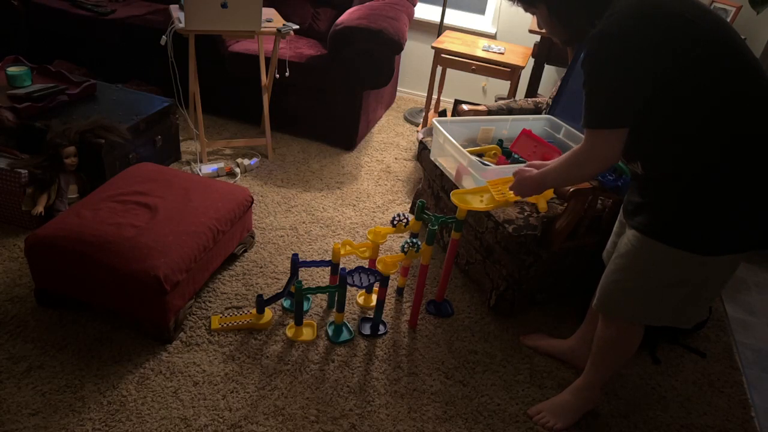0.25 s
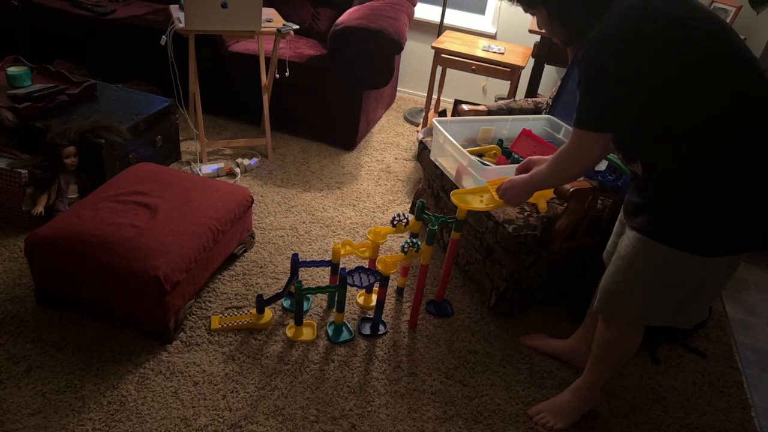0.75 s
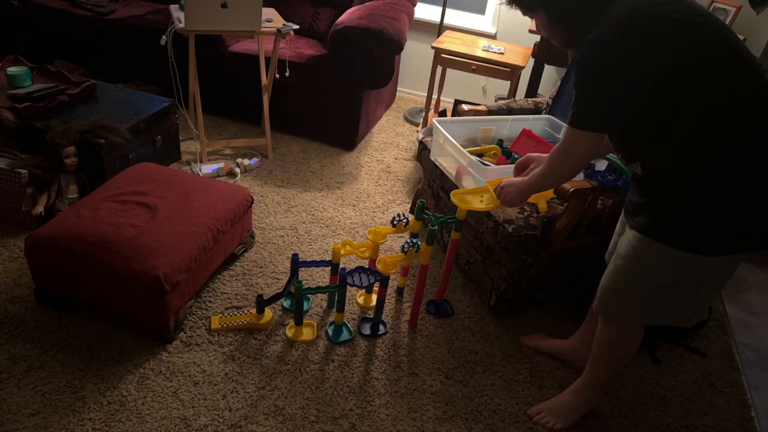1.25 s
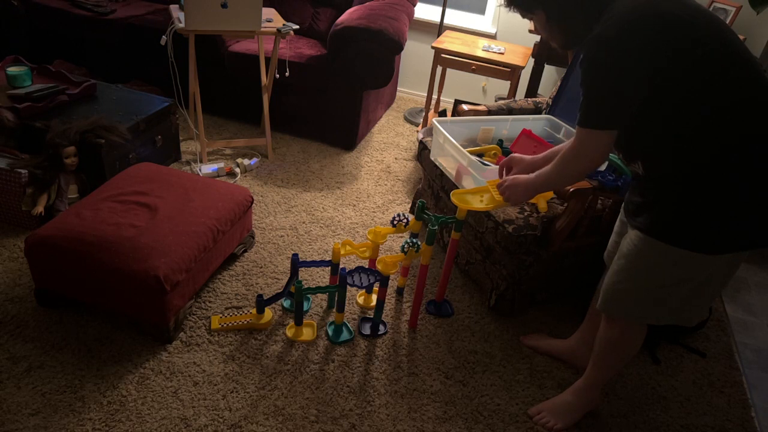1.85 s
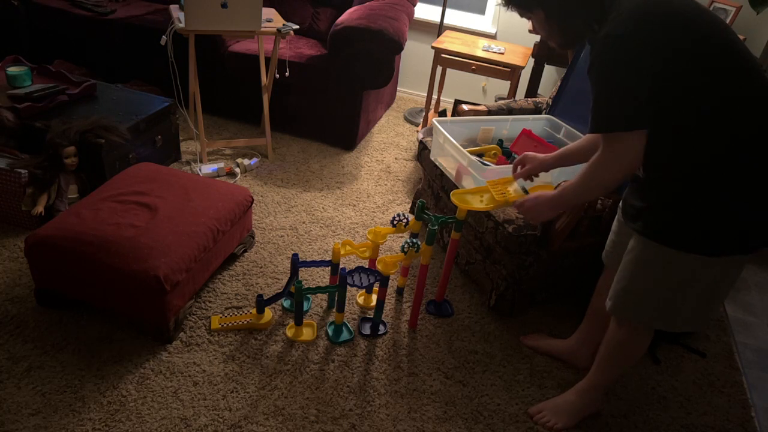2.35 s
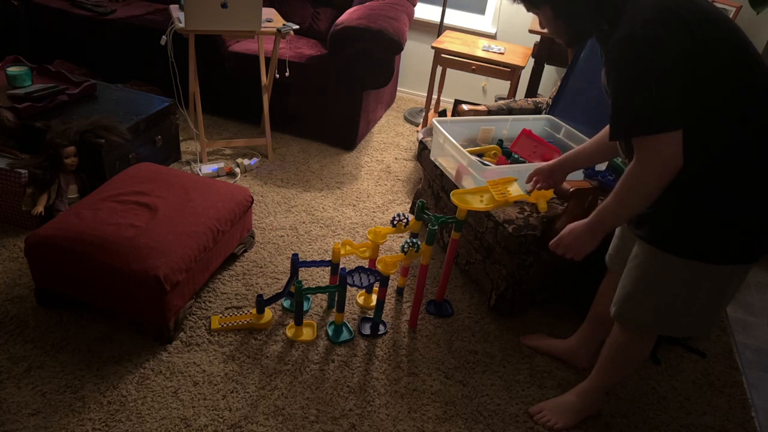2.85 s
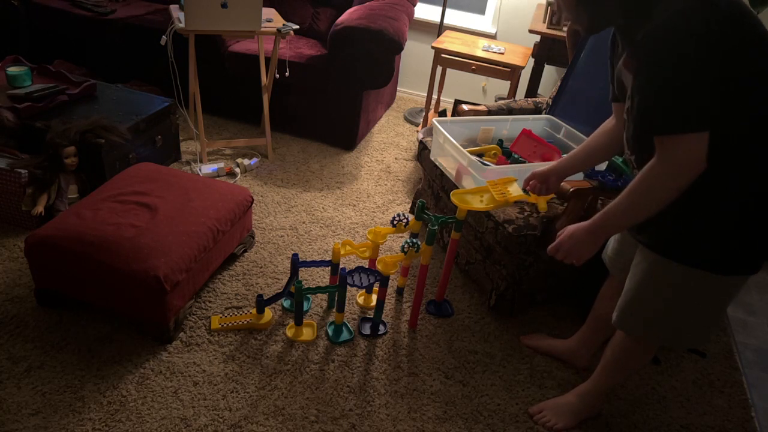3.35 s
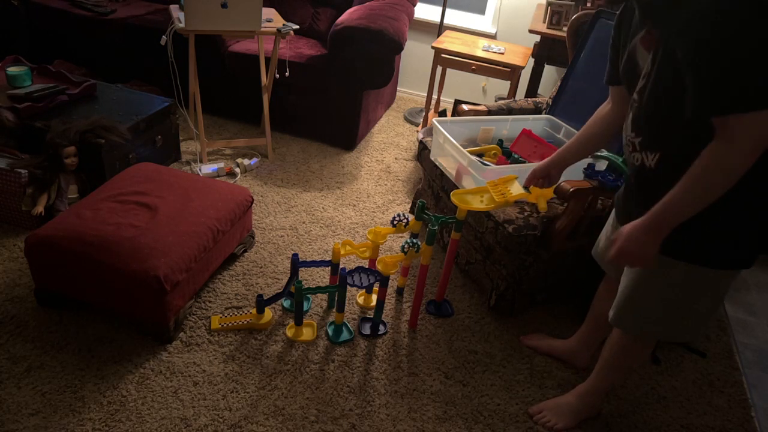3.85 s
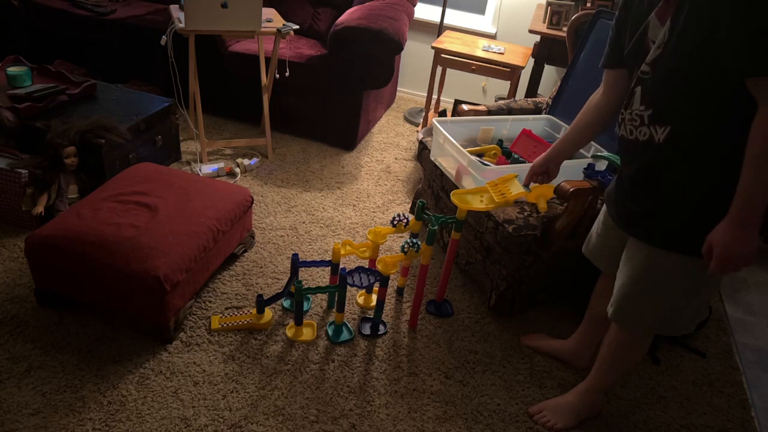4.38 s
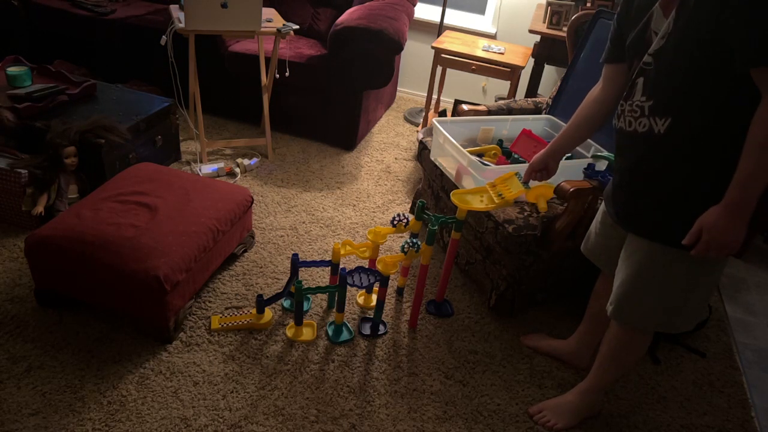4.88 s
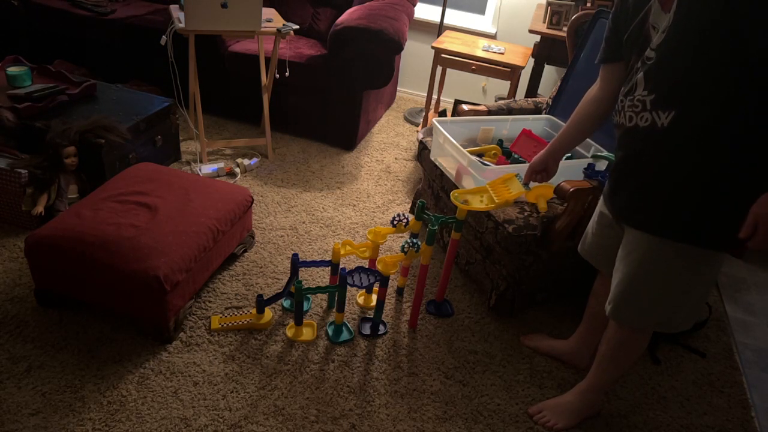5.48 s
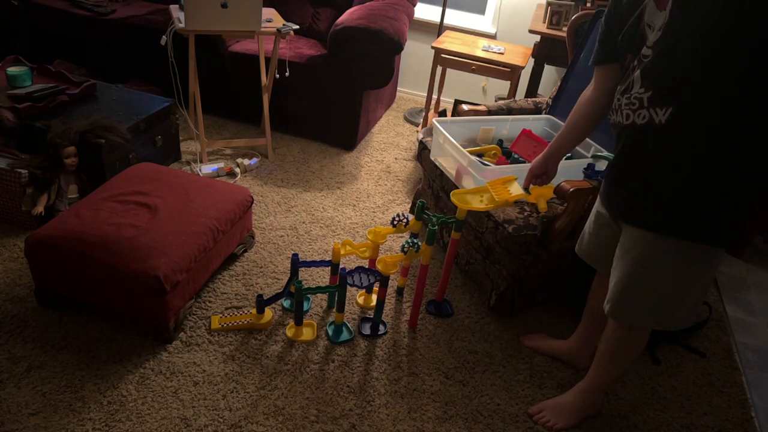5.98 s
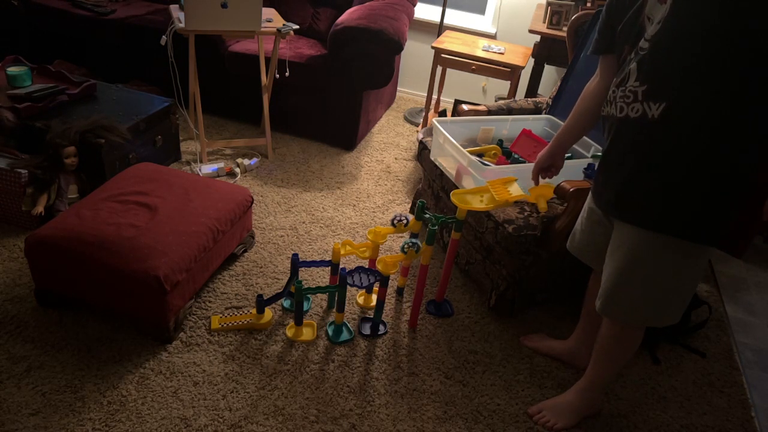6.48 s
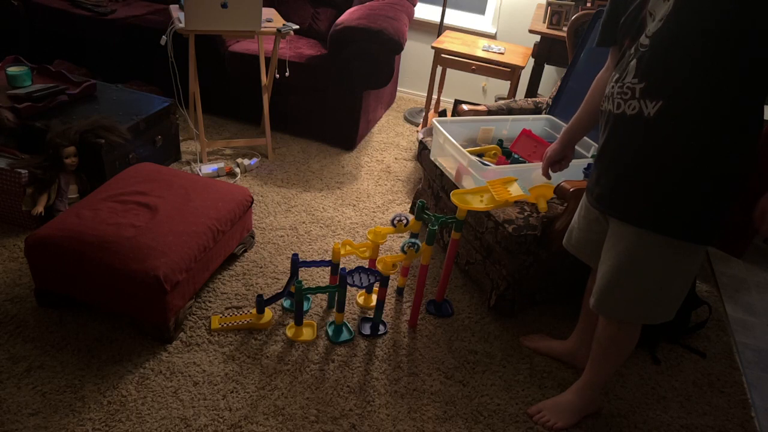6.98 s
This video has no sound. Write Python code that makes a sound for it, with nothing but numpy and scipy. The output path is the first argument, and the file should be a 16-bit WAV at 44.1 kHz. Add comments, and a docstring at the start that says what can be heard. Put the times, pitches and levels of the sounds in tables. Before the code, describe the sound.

Indoors, over a soft appliance hum, hiss and deep faint rumble, marbles tick lightly in a tray. One marble knocks its way down hollow plastic pieces, slowing to spaced clacks, then tapping faster and softer until it stops. A loud hollow gate slam follows, and a crowd of marbles rushes down the track in a dry, bright, continuous rattle with short pings, still going when it cuts off. Short room echo.

```python
"""Small ticks of marbles set into a tray, then a lone marble bouncing on a plastic toy track in a carpeted room.
A gate is knocked open and a crowd of marbles clatters down, now and then striking a ringing part.
Blows are filtered cracks plus decaying modes; rolling is random small knocks; the room adds random echo taps.
A faint appliance hum, hiss, a deep rumble and one thin whistle are filtered noise and wavering sines."""
import sys
import numpy as np
from scipy import signal
from scipy.fft import rfft, irfft
from scipy.io import wavfile
from scipy.ndimage import uniform_filter1d

SR = 44100
rng = np.random.default_rng(int(sys.argv[2]) if len(sys.argv) > 2 else 0)


def generate_wav(sig):
    """Save sig (samples, or channels by samples) to the path in sys.argv[1] as 16-bit PCM at SR."""
    pcm = np.round(np.clip(np.atleast_2d(sig).T, -1, 1) * 32767).astype(np.int16)
    wavfile.write(sys.argv[1], SR, pcm)


def makeup_ratio(level_db):
    """Linear amplitude ratio for a level in decibels (20 dB per factor of ten)."""
    decades = np.asarray(level_db, float) / 20
    return 10 ** decades


N = 318843
LEAD = 128  # samples that the band split smears ahead of a knock

# Modes of the track pieces. Each row: frequency in Hz, width in Hz (wider dies faster), level in dB.
TRACK = [(688, 18.5, -2), (1020, 12.7, -8.5), (1390, 9.5, -1), (2051, 150, 10.5), (2340, 24, 1),
         (2635, 43, 7), (3030, 66, 8.5), (3280, 59, 14), (4240, 73, 7), (4620, 92, -8), (4470, 8.3, -43),
         (5366, 99, -4.5), (5330, 330, -27.5), (6140, 220, -47), (6580, 140, -32)]


def evened(x):
    """Scales to rms 1."""
    return x / np.sqrt(np.mean(x ** 2) + 1e-20)


def read(points, hz):
    """Interpolates a table on a log-frequency axis."""
    f, value = np.transpose(points)
    return np.interp(np.log(hz + 1), np.log(f + 1), value)


def add(mix, start_s, sound):
    """Adds a sound at start_s, cut at the end of the mix."""
    part = mix[round(start_s * SR):][:len(sound)]
    part += sound[:len(part)]


def ring(hz, t60_s, size):
    """A sine that decays by 60 dB in t60_s."""
    t = np.arange(size) / SR
    return makeup_ratio(-60 * t / t60_s) * np.sin(2 * np.pi * hz * t)


def hiss():
    """Room and microphone hiss: noise shaped in frequency."""
    # Hiss spectrum. Each row: frequency in Hz, relative density in dB per Hz.
    hiss_shape = [(35, -32), (60, -19), (91, -3.5), (129, -7.5), (171, -1), (211, -10), (266, -3),
                  (336, -7), (709, -18.5), (874, -15.5), (1030, -20.5), (3450, -32.5), (9850, -45),
                  (13700, -35), (15700, -51)]
    hz = np.fft.rfftfreq(N, 1 / SR)
    noise = irfft(rfft(rng.standard_normal(N)) * makeup_ratio(read(hiss_shape, hz)), N)
    return makeup_ratio(-58) * evened(noise)


def hum():
    """Appliance hum: steady lines that waver in level and phase under slow complex noise."""
    # Hum lines. Each row: frequency in Hz, rms level in dB before wavering.
    hum_lines = [(86.1, -63), (118.4, -67), (177.6, -68), (263.8, -75), (312.2, -79), (506.0, -76),
                 (877.5, -74.5)]
    # Unsteadiness of each hum line in turn, 0 to 1.
    unsteadiness = [0.078, 0.055, 0.56, 0.68, 0.35, 0.11, 0.09]
    t = np.arange(N) / SR
    out = np.zeros(N)
    for (hz, db), waver in zip(hum_lines, unsteadiness):
        slow = uniform_filter1d(rng.standard_normal((2, N)), size=3000)
        a, b = uniform_filter1d(slow, size=3000)
        wobble = 1 + waver * (evened(a) + 1j * evened(b))
        out += np.sqrt(2) * makeup_ratio(db) * (wobble * np.exp(2j * np.pi * hz * t)).real
    return out


def rumble():
    """Deep rumble from outside: noise around 30-55 Hz on a slow swell."""
    # Rumble swell. Each row: time in seconds, level in dB.
    swell = [(0.0, -69), (3.5, -67), (6.26, -60.5), (7.23, -64)]
    band = signal.butter(2, [30, 55], "bandpass", fs=SR, output="sos")
    noise = evened(signal.sosfilt(band, rng.standard_normal(N)))
    return noise * makeup_ratio(np.interp(np.arange(N) / SR, *np.transpose(swell)))


def whistle():
    """A weak sine wavering in pitch and level, with a fainter partner above it."""
    # Whistle pitch. Each row: time in seconds, frequency in Hz.
    pitch = [(4.63, 11435), (4.652, 11332), (4.69, 12436), (4.742, 11865), (4.812, 12200), (4.846, 11763),
             (4.888, 12300), (4.965, 10300), (5.0, 10150)]
    level_db, flicker_depth = -80.5, 0.9
    partner_ratio, partner_db = 1.25, -8
    s, hz = np.transpose(pitch)
    t = np.arange(s[0], s[-1], 1 / SR)
    jitter_hz = 60 * evened(uniform_filter1d(rng.standard_normal(len(t)), size=200))
    phase = 2 * np.pi * np.cumsum(np.interp(t, s, hz) + jitter_hz) / SR
    flicker = 1 + flicker_depth * evened(uniform_filter1d(rng.standard_normal(len(t)), size=600))
    tone = np.sin(phase) + makeup_ratio(partner_db) * np.sin(partner_ratio * phase)
    fade = signal.windows.tukey(len(t), 0.2)
    out = np.zeros(N)
    add(out, s[0], np.sqrt(2) * makeup_ratio(level_db) * tone * flicker * fade)
    return out


def tray():
    """Hollow knocks of the big start tray: decaying modes that swell as echoes arrive."""
    # Tray modes. Each row: frequency in Hz, level in dB, t60 in seconds.
    tray_modes = [(304.7, 2, 0.19), (299, -4.5, 0.26), (295, 5, 0.09), (373, 1, 0.082), (510, -10, 0.08),
                  (682, 3, 0.13), (973, 0.5, 0.21)]
    # Tray knocks. Each row: start in seconds, level in dB.
    tray_knocks = [(2.093, -44), (5.213, -21), (5.244, -19.5)]
    out, t = np.zeros(N), np.arange(20000) / SR
    swell = (1 - np.exp(-t / 0.015)) ** 2
    body = sum(makeup_ratio(db) * ring(hz, t60_s, len(t)) for hz, db, t60_s in tray_modes)
    for s, db in tray_knocks:
        add(out, s, makeup_ratio(db) * body * swell)
    return out


def chime():
    """A small hard part rings on: two close low modes beat under a high one, swelling as echoes arrive."""
    # Modes of the ringing part. Each row: frequency in Hz, level in dB, t60 in seconds.
    chime_modes = [(4060, 0.5, 0.16), (4150, 1.5, 0.28), (7900, 3, 0.18)]
    # Strikes on it. Each row: start in seconds, level in dB, extra gain of the top mode in dB.
    strikes = [(6.4534, -29, -20), (6.5008, -27, -15), (7.1368, -13.5, -14.5)]
    sag_per_s = 0.2  # share of pitch lost in a second as the part swings
    flutter_depth = 0.4  # echoes beat with the ring
    out, t = np.zeros(N), np.arange(20000) / SR
    bend = 1 - sag_per_s * t / 2
    for s, db, top_db in strikes:
        low, beat, top = (makeup_ratio(m) * ring(hz * bend, t60_s, len(t)) for hz, m, t60_s in chime_modes)
        flutter = 1 + flutter_depth * evened(uniform_filter1d(rng.standard_normal(len(t)), size=300))
        tone = low + beat + makeup_ratio(top_db) * top
        add(out, s, makeup_ratio(db) * tone * flutter * (1 - np.exp(-t / 0.0012)))
    return out


def knock_parts(own_hz, modes_db=-7, own_db=-5):
    """One marble on the track: dry crack, track modes in a chance mix, short ring of the piece hit.
    Returns dull, middle, bright and sharp parts of equal energy."""
    # Bare crack of glass on plastic. Each row: frequency in Hz, relative density in dB per Hz.
    crack_shape = [(300, -23), (600, -10), (1000, -2.5), (1700, 0), (2400, 0.5), (3500, 1), (4300, -3),
                   (5200, -13.5), (7000, -19.5), (9000, -24), (11500, -28), (13200, -33), (14800, -31),
                   (16000, -33)]
    size = 4096
    hz, t = np.fft.rfftfreq(size, 1 / SR), np.arange(size) / SR
    mix, detune = rng.standard_normal((2, len(TRACK)))
    body = sum(makeup_ratio(db + 7 * m) * ring(f * (1 + 0.0033 * d), 4.2 / width, size)
               for (f, width, db), m, d in zip(TRACK, mix, detune))
    crack = 0.14 * rng.standard_normal(size) * np.exp(-t / 0.0034)  # loose joints chatter after contact
    crack[0] = 1
    crack = irfft(rfft(crack) * makeup_ratio(read(crack_shape, hz)))
    own = ring(own_hz, 0.045, size)
    sound = rfft(evened(crack) + makeup_ratio(modes_db) * evened(body) + makeup_ratio(own_db) * evened(own))
    # thin plastic gives no bass: nothing is kept below the first edge
    above = [1 / (1 + (edge_hz / (hz + 1)) ** 8) for edge_hz in (430, 1200, 2800, 5000)]
    bands = -np.diff(above + [0 * hz], axis=0)
    parts = np.roll(irfft(sound * bands), LEAD, axis=1)
    spread = 12  # the room spreads a knock's energy over about 150 samples near its peak
    return spread * parts / np.linalg.norm(parts, axis=1)[:, None]


def small_knocks():
    """Random small knocks of rolling marbles, a few larger, as low and high layers at three places."""
    knocks_per_s, pieces = 450, 9
    low, high = np.zeros((2, 3, N))
    for k, hz in enumerate(np.geomspace(1300, 3100, num=pieces)):
        hit = rng.random(N) < knocks_per_s / pieces / SR
        size = makeup_ratio(1.8 * np.minimum(rng.exponential(1, N), 4)) * hit
        dull, middle, bright, sharp = knock_parts(hz, modes_db=-10, own_db=-13)
        low[k % 3] += signal.oaconvolve(size, makeup_ratio(-16) * dull + middle)[:N]
        high[k % 3] += signal.oaconvolve(size, bright + makeup_ratio(-5) * sharp)[:N]
    return evened(low), evened(high)


def tube_hum():
    """Noise keeps the lowest tube mode and its two upper partners humming."""
    # Level in dB of the 2nd and 3rd air modes.
    upper_db = [-2, -10]
    hz, width, _ = TRACK[0]
    modes = ring(hz, 1.9 / width, 8192)
    for k, db in zip((2, 3), upper_db):
        modes = modes + makeup_ratio(db) * ring(TRACK[k][0], 6.1 / width, 8192)
    return evened(signal.oaconvolve(rng.standard_normal(N), modes)[:N])


def tower_shake():
    """The towers shake on the carpet under the marbles: noise at 230-430 Hz."""
    band = signal.butter(2, [230, 430], "bandpass", fs=SR, output="sos")
    return evened(signal.sosfilt(band, rng.standard_normal(N)))


def rattle():
    """Rolling: small knocks, tube hum and shaking follow one level curve; lone marbles dull, the crowd bright."""
    # How much is rolling. Each row: time in seconds, level in dB.
    rolling = [(0.0, -56), (0.11, -61.5), (0.4, -92), (1.2, -82), (1.308, -57), (1.454, -64), (1.66, -63),
               (1.92, -63), (2.1, -64), (3.2, -67), (3.772, -61), (4.116, -66), (4.5, -90), (5.14, -60.5),
               (5.19, -59), (5.31, -27.5), (5.38, -36.5), (5.75, -26.5), (6.04, -28), (6.23, -39.5),
               (6.47, -44), (6.62, -34), (7.23, -35)]
    crowd_s, tube_exit_s = 5.14, 6.26  # the crowd starts; it leaves the tube
    t = np.arange(N) / SR
    bright_db = np.where(t < crowd_s, -36, -9.5)
    tube_db = np.where(t < crowd_s, -3, -2) - 8.5 * (t > tube_exit_s)
    low, high = small_knocks()
    out = low + makeup_ratio(bright_db) * high
    out[0] += makeup_ratio(tube_db) * tube_hum()
    out[1] += makeup_ratio(-18.5) * tower_shake()
    level_db = np.interp(t, *np.transpose(rolling))
    return out * makeup_ratio(level_db) / np.sqrt(6)


def blows():
    """Distinct blows, dealt in turn to three places along the track; harder contact is brighter."""
    # Blows: marbles set or settling in the tray; bounces of a lone marble on the plastic track;
    # the gate lifting and slamming; the crowd's loudest collisions.
    # Each row: start in seconds, level in dB, ring of the piece hit in Hz, hardness in dB.
    loading, bounces = [(0.0044, -49.5, 1630, 2), (0.0355, -45.5, 1850, -3), (0.054, -44.5, 2700, -5),
                        (0.144, -46, 1720, -7), (0.218, -49.5, 1755, -12), (0.3027, -53, 1730, -8),
                        (0.8875, -52.5, 1710, 9), (0.9794, -57.5, 1420, 2), (1.047, -55, 1720, 1),
                        (1.1704, -59, 1760, 15), (1.265, -47.5, 2670, -5), (1.3343, -37.5, 2930, -2),
                        (1.406, -45.5, 1535, -3), (1.4985, -49, 2970, -4), (1.5463, -42.5, 3000, 6.5),
                        (4.0302, -48.5, 1710, 1), (4.1032, -60, 1590, -5), (4.1778, -55.5, 2440, 2),
                        (4.28, -52.5, 1840, -5), (4.306, -59, 2510, -8), (4.9708, -60, 2670, 6),
                        (4.992, -56, 2680, 5)], [(1.6671, -36, 1940, -2), (1.7532, -35, 1720, -2),
                                         (1.8436, -35, 1384, -3), (1.9215, -36, 1790, -10),
                                         (1.9687, -29.5, 2560, 6.5), (2.05, -41.5, 1390, -2),
                                         (2.0883, -23.5, 3080, 8), (2.102, -29, 1690, -11),
                                         (2.175, -40, 1390, -10), (2.2189, -28.5, 2220, 5),
                                         (2.2242, -28, 1375, -0.5), (2.4514, -26, 1754, 2),
                                         (2.6724, -41, 1750, -4), (2.6811, -29.5, 2090, -1),
                                         (2.8596, -29, 2430, 2), (3.012, -44, 2300, -8),
                                         (3.0245, -31, 2130, -0.5), (3.1628, -30.5, 1890, 0),
                                         (3.235, -46, 1380, -20), (3.2964, -31, 1740, -2.5),
                                         (3.3987, -33, 2170, -1), (3.4835, -36.5, 2200, -1),
                                         (3.5603, -36, 1700, -4.5), (3.6384, -38.5, 1730, -2),
                                         (3.706, -40.5, 1720, -2), (3.7569, -42.5, 1540, 0),
                                         (3.813, -46, 1730, -4), (3.8452, -48, 1640, -8),
                                         (3.9052, -44.5, 1676, -7)]
    gate, clatter = [(5.1333, -37.5, 1270, 0), (5.1445, -35.5, 2660, 2), (5.164, -37.5, 1330, 6),
                     (5.2125, -11, 2410, -4), (5.2294, -13, 2320, 2.5), (5.2439, -11, 2630, -1),
                     (5.2579, -24, 2340, -16), (5.2894, -18, 2450, 0.5), (5.3151, -22, 1470, 5.5)], [(5.4331, -31, 1390, 15), (5.4658, -29, 2350, 9),
                                   (5.4855, -19.5, 2835, 5.5), (5.5348, -18.5, 3030, 1),
                                   (5.5694, -19.5, 2340, 2.5), (5.5942, -19, 2520, -1),
                                   (5.6291, -20.5, 2340, 0.5), (5.6802, -18, 2340, -2),
                                   (5.7028, -28.5, 2360, 10.5), (5.7207, -15, 2350, -4),
                                   (5.7378, -16.5, 1720, 1), (5.7644, -17.5, 2340, 4.5),
                                   (5.7844, -22.5, 2340, 5), (5.804, -17.5, 1990, -36),
                                   (5.8337, -18, 3030, 2.5), (5.845, -17.5, 1985, -17),
                                   (5.8644, -19.5, 1985, -6), (5.9244, -16.5, 2930, 3),
                                   (5.9534, -31.5, 1390, 15), (5.9778, -18.5, 3030, 2),
                                   (6.0065, -17, 1390, -0.5), (6.019, -22.5, 3030, 2),
                                   (6.0527, -16.5, 2370, -2), (6.0611, -22, 2410, -1),
                                   (6.0995, -25.5, 2950, 5), (6.122, -18.5, 2370, -2.5),
                                   (6.1905, -23.5, 4095, 2), (6.1965, -18, 2310, 1),
                                   (6.2163, -22, 1725, -3), (6.2494, -29, 1900, -15),
                                   (6.3518, -36, 2050, -18), (6.3904, -21.5, 1790, -4),
                                   (6.4009, -18, 2360, -1), (6.4194, -22, 2230, 3.5),
                                   (6.4464, -17, 2310, -2.5), (6.4595, -19, 4040, 0.5),
                                   (6.4994, -20, 3980, -9), (6.5294, -23.5, 4180, -25),
                                   (6.5934, -33, 4040, 1), (6.615, -17, 2090, 2.5), (6.6344, -23, 2120, -5),
                                   (6.6594, -28.5, 2200, 3), (6.7406, -23.5, 2130, -20),
                                   (6.7615, -29.5, 2100, -2.5), (6.832, -25.5, 1420, 0),
                                   (6.8374, -18.5, 2360, -6), (6.8857, -21, 2890, 3.5),
                                   (6.9194, -22, 2420, 0), (6.9452, -25.5, 1870, 0),
                                   (7.0094, -30.5, 2270, -12), (7.0918, -23, 1613, -3),
                                   (7.1151, -19.5, 2380, -13), (7.1304, -24.5, 3830, 10.5),
                                   (7.1345, -21.5, 2280, 2), (7.1379, -19, 2190, 1),
                                   (7.1428, -25.5, 4090, 6), (7.1537, -31, 4060, 7),
                                   (7.201, -22, 2350, -0.5)]
    # Colour of an average blow, in dB: dull, bright and sharp parts against the middle,
    # ring of the piece, track modes.
    loading_colour, bounce_colour = [-16.5, -15, -17, -4.5, -6], [-11, -25, -16.5, -10, -9]
    gate_colour, clatter_colour = [-10, -7, -6.5, -7, -6.5], [-14.5, -4.5, -7, -3, -7]
    # Gain of the dull, bright and sharp parts, in dB per dB of hardness.
    hardening = np.array([0.019, 0.21, 0.86])
    spot_db = 2  # chance of the spot hit, in the dull and bright parts
    bright_db_per_octave = 6  # small pieces ring higher and sound brighter
    own_db_per_hardness_db = -0.29  # soft blows leave more of the piece's own ring
    thinning_db_per_s = -0.5  # the crowd's dull part fades as it reaches the smaller pieces lower down
    out = np.zeros((3, N + LEAD))
    for table, colour in ((loading, loading_colour), (bounces, bounce_colour),
                          (gate, gate_colour), (clatter, clatter_colour)):
        *colour_db, own_db, modes_db = colour
        for k, (s, db, hz, hard_db) in enumerate(table):
            spot = spot_db * rng.standard_normal(3) * [1, 1, 0]
            dull_db, bright_db, sharp_db = colour_db + hard_db * hardening + spot
            dull_db += thinning_db_per_s * max(s - clatter[0][0], 0)
            bright_db += bright_db_per_octave * np.log2(hz / 2000)
            parts = knock_parts(hz, modes_db, own_db + own_db_per_hardness_db * hard_db)
            knock = makeup_ratio([dull_db, 0, bright_db, sharp_db]) @ parts
            add(out[k % 3], s, makeup_ratio(db) * knock)
    return out[:, LEAD:]


def room(places):
    """Direct sound, then sparse taps of random sign that die band by band; other taps for each place."""
    # Reverberation. Each row: frequency in Hz, t60 in seconds.
    decay = [(300, 0.5), (800, 0.57), (2100, 0.31), (5500, 0.33), (9000, 0.42), (12000, 0.36), (15000, 0.5)]
    direct_db = -6  # against a tail of unit energy
    taps = np.zeros((3, SR // 2))
    slots = np.arange(40, SR // 2 - 20, 16)
    at = slots + rng.integers(0, 16, (3, len(slots)))
    np.put_along_axis(taps, at, rng.choice([-1., 1.], at.shape), 1)
    hz, t, z = signal.stft(taps, SR, nperseg=128)
    early = 1 + 0.87 * np.exp(-t / 0.0093)  # near furniture and floor answer first
    fall = makeup_ratio(-60 * t / read(decay, hz)[:, None])
    tail = signal.istft(z * early * fall, SR, nperseg=128)[1]
    tail /= np.linalg.norm(tail, axis=1)[:, None]
    tail[:, :2] += makeup_ratio(direct_db) * np.array([1, -0.85])  # treble beams straight at the microphone
    return signal.fftconvolve(places, tail, axes=1)[:, :N].sum(0)


def scene():
    """Track sounds through the room, over the ringing parts and the background."""
    track = room(blows() + rattle())
    background = hiss() + hum() + rumble() + whistle()
    return (track + chime() + tray() + background)[None]


def roll_off(x):
    """The treble ends steeply here."""
    return signal.sosfilt(signal.butter(12, 16800, fs=SR, output="sos"), x)


def record(dry):
    """The microphone cuts the deepest bass and the top treble."""
    bass_cut = signal.butter(3, 32, "highpass", fs=SR, output="sos")
    top_cut = signal.firwin(255, 15750, window=("kaiser", 4), fs=SR)[None]
    mix = signal.oaconvolve(signal.sosfilt(bass_cut, dry), top_cut, "same")
    return roll_off(mix)


dry = scene()
out = record(dry)
generate_wav(out)
```